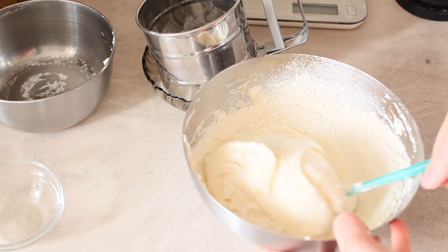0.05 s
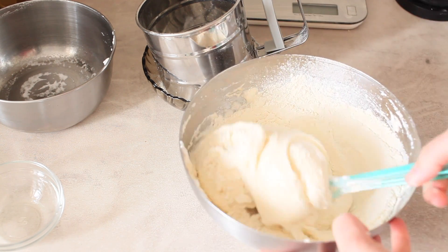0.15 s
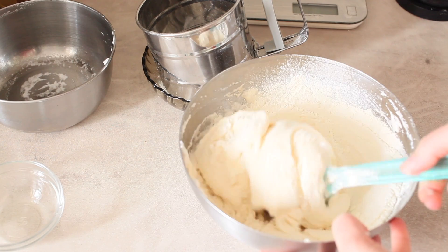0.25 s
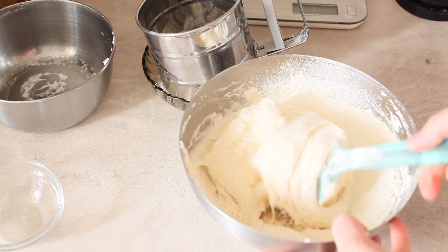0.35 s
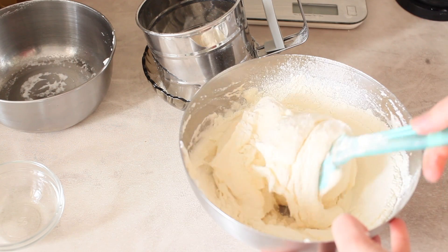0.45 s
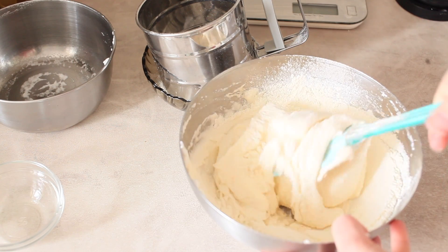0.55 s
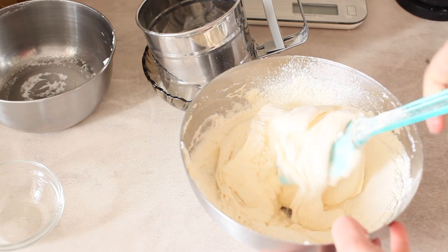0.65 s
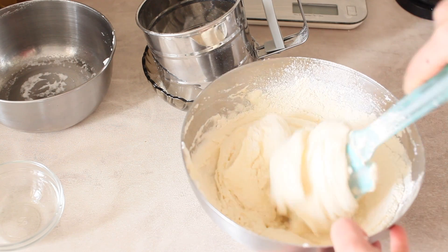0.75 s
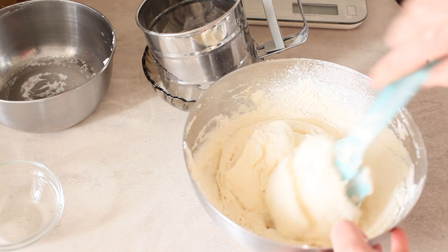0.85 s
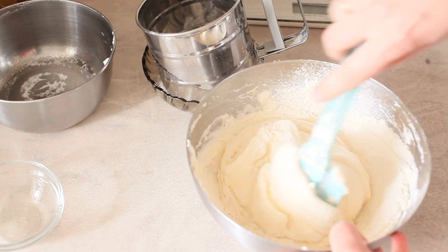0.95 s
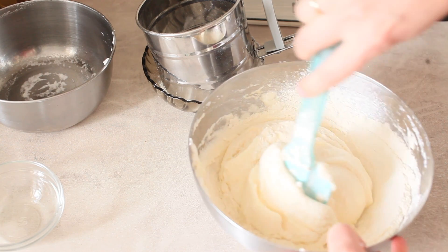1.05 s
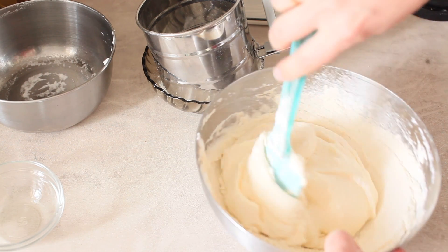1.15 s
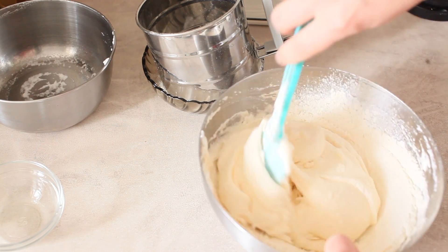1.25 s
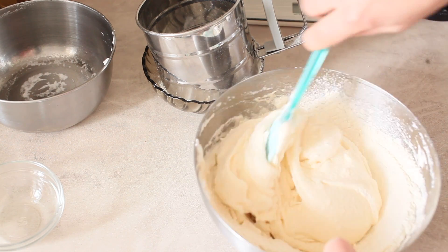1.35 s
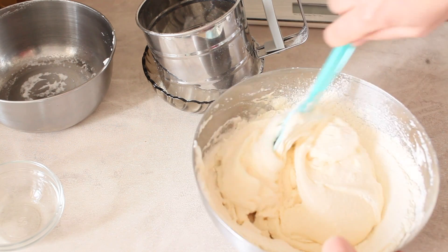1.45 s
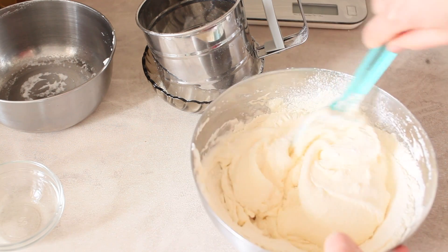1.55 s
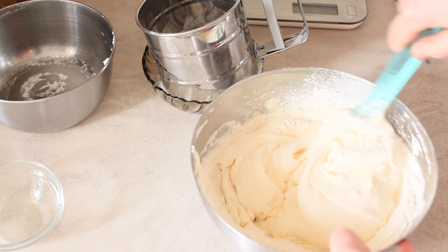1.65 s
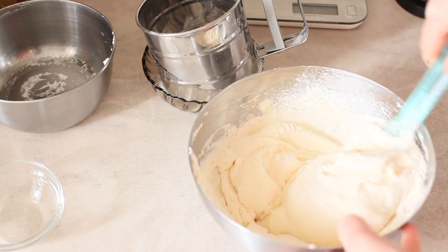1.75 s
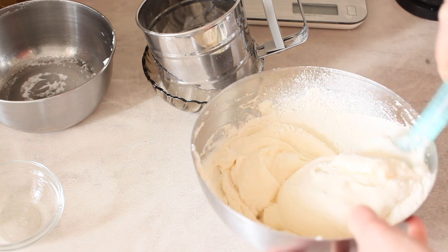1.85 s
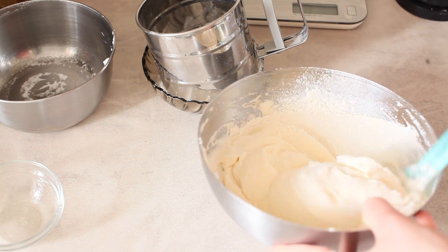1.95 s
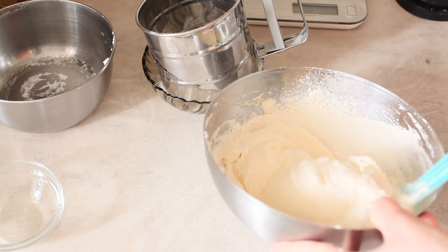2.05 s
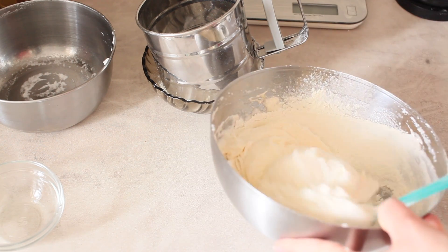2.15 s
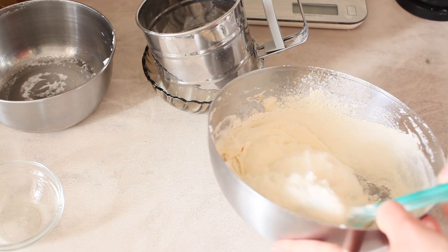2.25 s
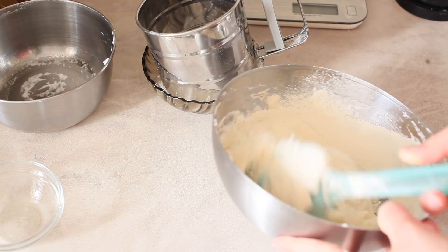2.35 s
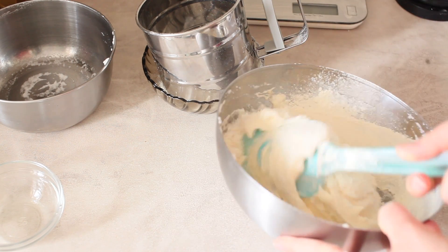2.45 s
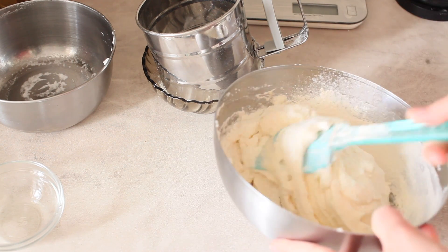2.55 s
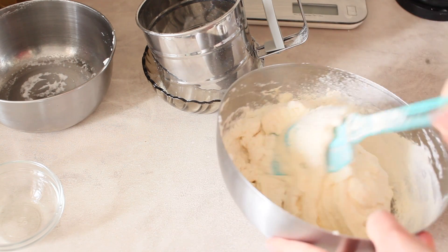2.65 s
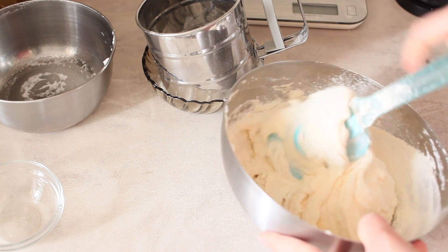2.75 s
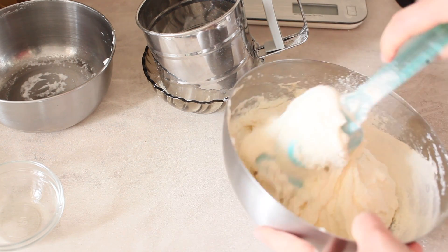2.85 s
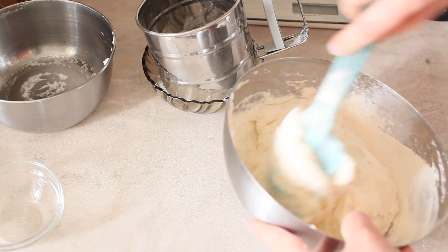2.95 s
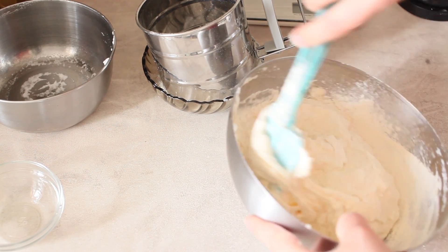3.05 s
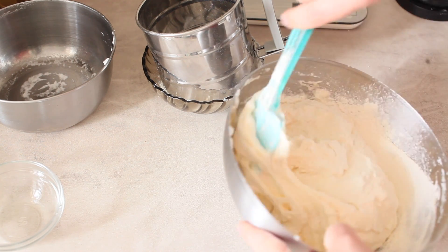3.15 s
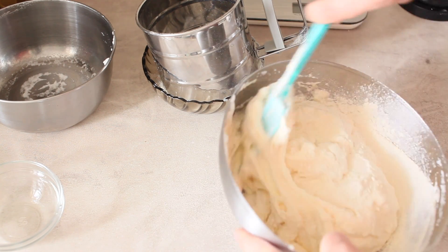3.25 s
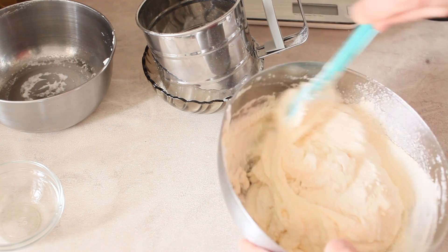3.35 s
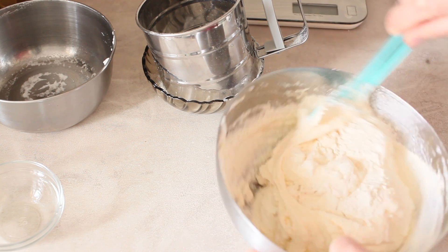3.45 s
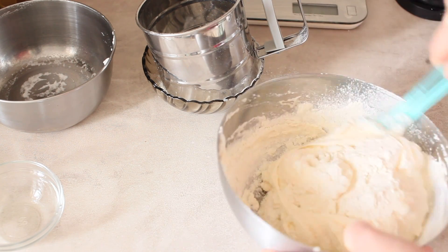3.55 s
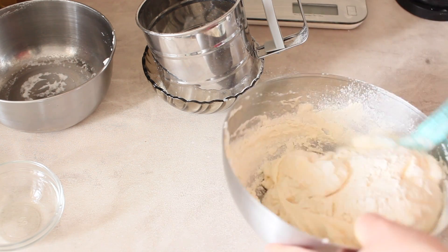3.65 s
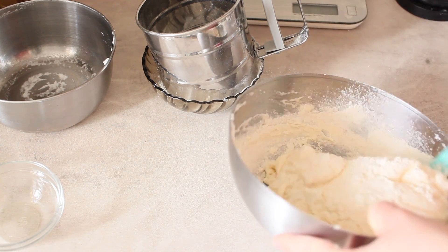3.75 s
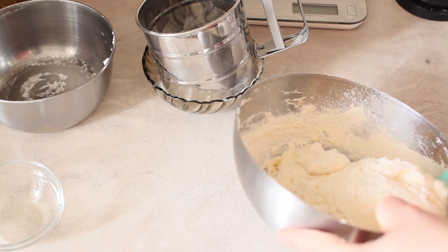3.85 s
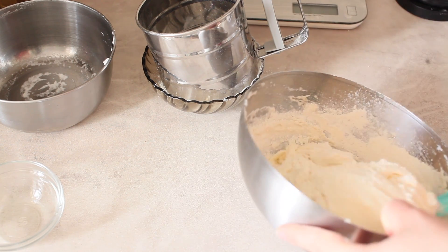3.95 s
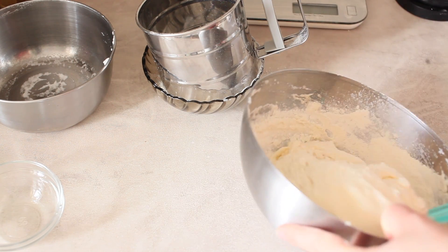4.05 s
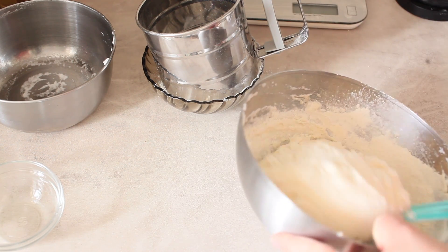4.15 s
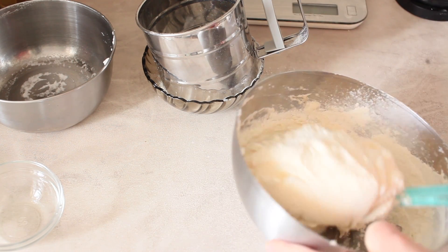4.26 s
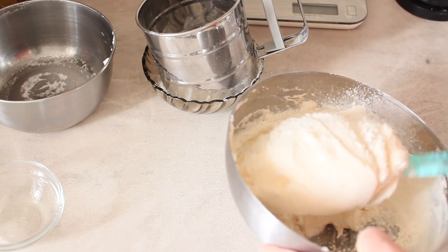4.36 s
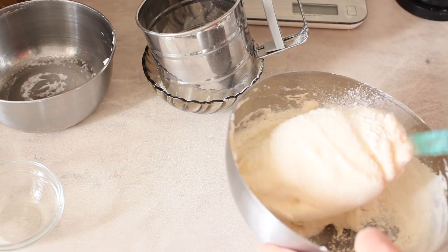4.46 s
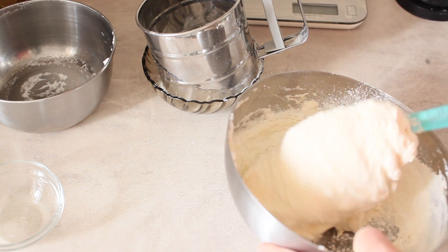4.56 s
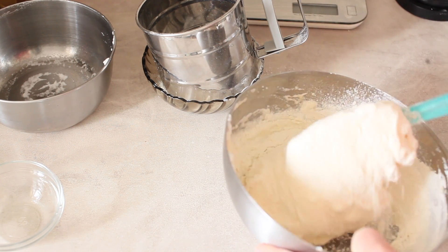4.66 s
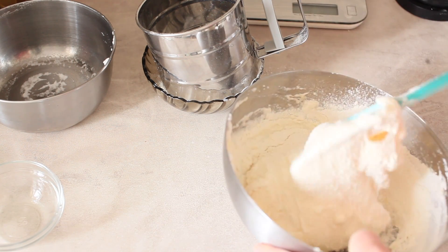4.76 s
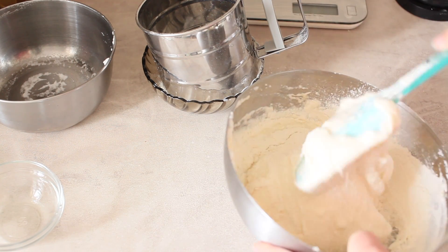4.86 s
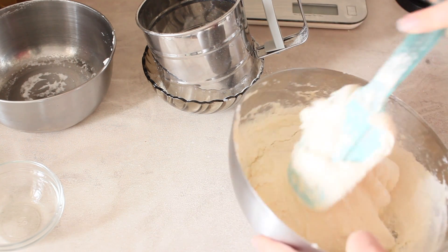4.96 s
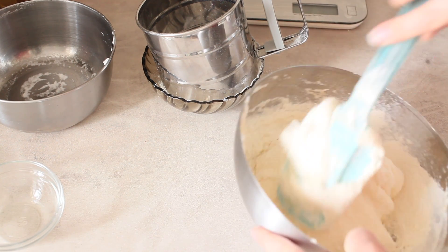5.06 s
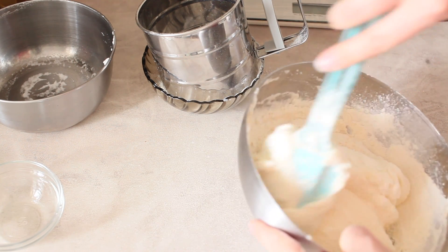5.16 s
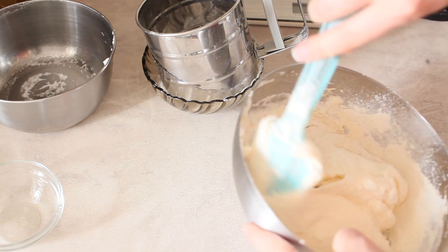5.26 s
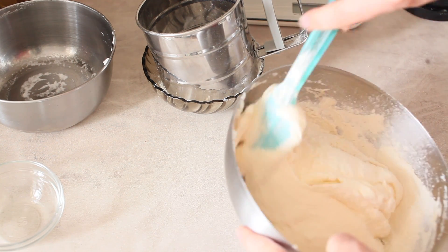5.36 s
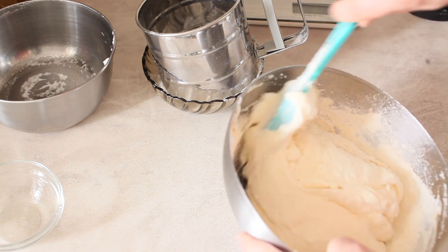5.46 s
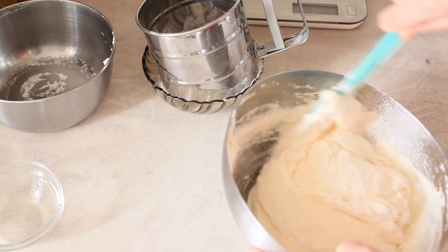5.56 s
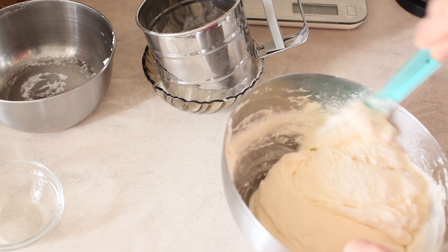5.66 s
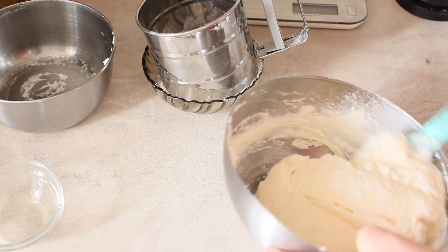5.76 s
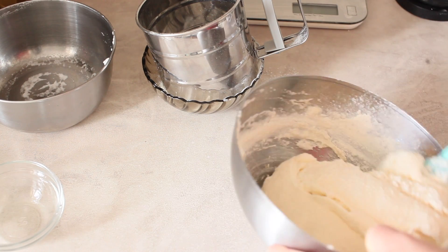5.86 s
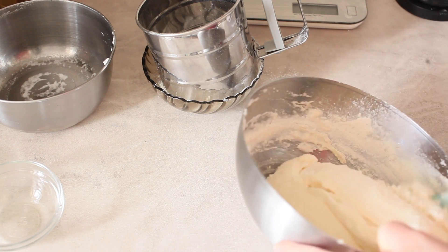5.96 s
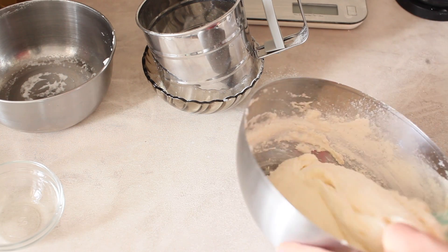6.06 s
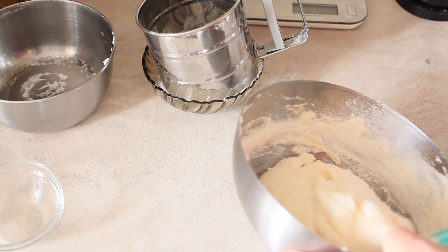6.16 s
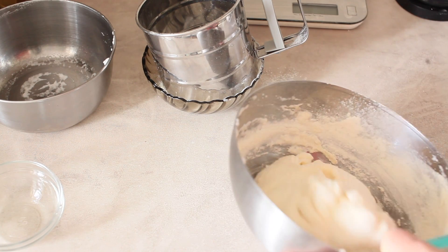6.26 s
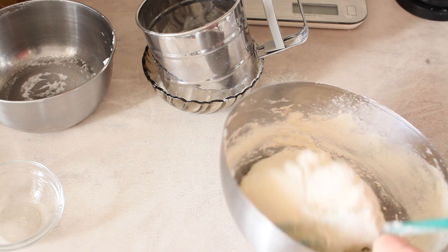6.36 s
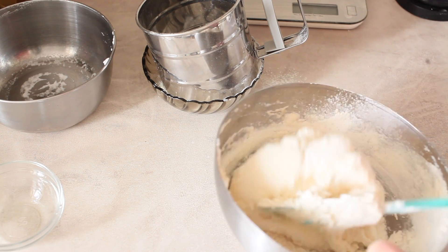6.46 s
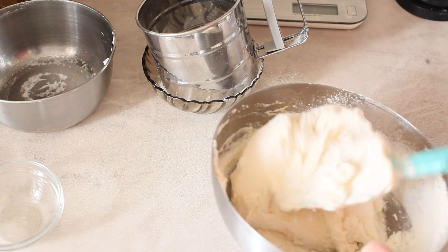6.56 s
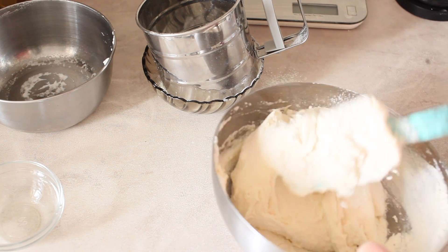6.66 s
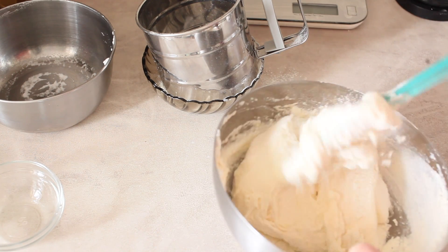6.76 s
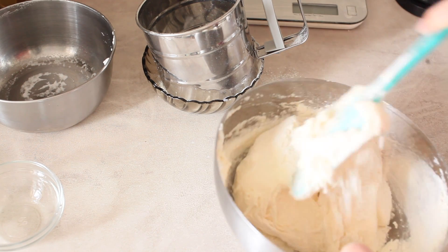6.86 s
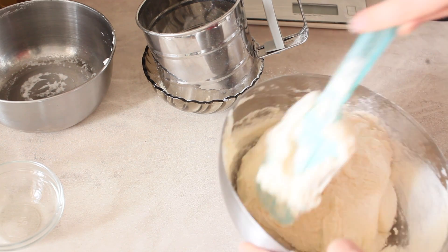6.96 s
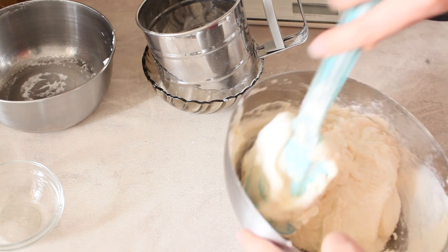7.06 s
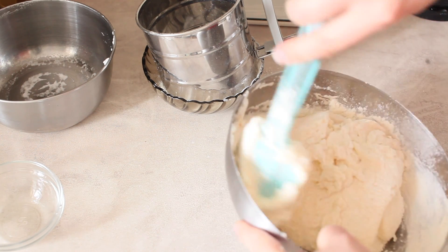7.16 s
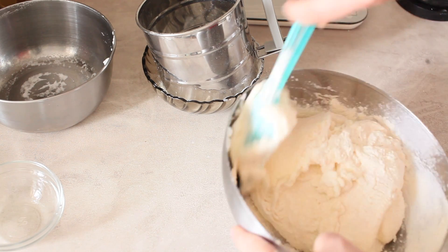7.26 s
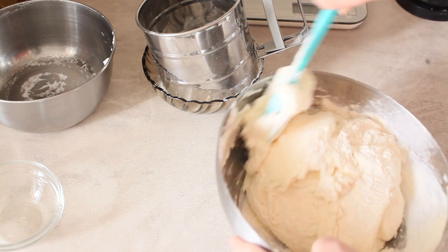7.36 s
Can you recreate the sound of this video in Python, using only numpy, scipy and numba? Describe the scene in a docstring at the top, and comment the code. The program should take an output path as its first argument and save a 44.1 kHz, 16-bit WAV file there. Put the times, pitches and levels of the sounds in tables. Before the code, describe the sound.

A silicone spatula folds batter in a stainless steel bowl, heard close in a kitchen with little echo. At the start a soft scrape leads into a quick double knock of the bowl on the worktop, at about 0.2 seconds. After a lull, the bowl knocks and rocks again at 1.5 seconds, and a hollow, hissing scrape runs until about 2.4, with short damped clangs as the edge catches the wall. A second stroke lasts from 3.1 to 4.2 seconds, with a ringing knock at 3.5. A brighter, raspier stroke runs from 5.3 to 6.3 seconds, with a knock at 5.7 and a sharp catch around 6. A last scrape begins at about 7.2 and carries on to the end. Underneath, a faint low kitchen hum rises with each stroke and sinks in the pauses.

```python
"""A hollow scrape, short clangs and a bright hiss: a silicone spatula folds batter in a steel bowl.
Stick-slip friction at the rubbing contact excites the modes of the batter-damped wall.
The bowl is held, tilted and turned, so its foot now and then knocks the kitchen worktop, ringing both.
Behind it, a noise suppressor lets the low kitchen hum swell with the work and sink after it."""
import sys
import numpy as np
from scipy import signal
from scipy.fft import rfft, irfft
from scipy.io import wavfile
from scipy.ndimage import uniform_filter1d
from numba import njit

SR = 44100
rng = np.random.default_rng(int(sys.argv[2]) if len(sys.argv) > 2 else 0)


def wrap_up_sound(samples):
    """Save the sound to the file named by the first command line argument, as 16-bit audio."""
    columns = np.atleast_2d(samples).T
    # keep every value between -1 and 1, then stretch to whole-number steps
    tamed = np.clip(columns, -1, 1)
    steps = np.round(tamed * 32767).astype(np.int16)
    wavfile.write(sys.argv[1], SR, steps)


N = 326340
T = np.arange(N) / SR

# Strokes of the blade, one list each: (time [s], hiss level [dB], hiss centre [Hz], scrape level [dB],
# scrape centre [Hz], clang level [dB], clang centre [Hz], thin clang level [dB], thin clang centre [Hz],
# top level [dB], clang spread [ln of frequency ratio], scrape spread [ln of frequency ratio])
BLADE_STROKES = [
    [(0.0, -65, 8500, -54, 1320, -70, 3000, -80, 5980, -74.5, 0.15, 0.17),
     (0.06, -59, 8800, -58, 1170, -62, 3060, -75.5, 5780, -78, 0.12, 0.177),
     (0.104, -71, 8380, -51, 1450, -69, 3110, -72, 5770, -77, 0.195, 0.12),
     (0.135, -64, 8140, -46, 1445, -58, 3050, -65, 5980, -79.5, 0.2, 0.065)],
    [(1.1, -84, 7920, -70, 1510, -84.5, 2790, -80, 6140, -90.5, 0.2, 0.049),
     (1.164, -91, 8280, -51.5, 1532, -82, 2900, -94, 6110, -96, 0.19, 0.037),
     (1.22, -94, 8220, -66, 1500, -86, 2680, -90, 5890, -94, 0.2, 0.054)],
    [(1.58, -45, 8080, -34, 980, -49, 3910, -52, 6050, -72, 0.14, 0.16),
     (1.604, -48, 8950, -52.5, 1030, -57, 3590, -65, 6030, -71.5, 0.21, 0.3),
     (1.652, -38, 9850, -52, 1410, -67, 3280, -58, 5990, -60, 0.135, 0.188),
     (1.732, -39.5, 9535, -54.5, 1200, -68, 3020, -72, 6090, -45, 0.126, 0.36),
     (1.8, -40.5, 9050, -34, 1025, -59, 4000, -68, 5250, -53.5, 0.15, 0.28),
     (1.81, -40, 9240, -29, 1104, -40, 4070, -42, 5300, -47, 0.102, 0.199),
     (1.86, -39.5, 8750, -34, 1146, -52, 3920, -63, 5240, -58, 0.13, 0.27),
     (1.894, -36.5, 9240, -33, 1215, -43, 3720, -46, 5160, -51, 0.3, 0.21),
     (1.912, -38.5, 9160, -28, 1250, -49, 3850, -58, 4960, -54, 0.19, 0.2),
     (2.02, -46, 8970, -41, 1240, -43.5, 3340, -58, 5200, -66, 0.066, 0.25),
     (2.052, -54, 8940, -43, 1295, -73, 3400, -66.5, 5840, -59.5, 0.11, 0.15),
     (2.136, -40, 9400, -52.5, 1190, -61, 3010, -57, 6330, -53.5, 0.28, 0.225),
     (2.188, -46, 9304, -52.5, 1220, -62, 2780, -62, 5850, -60, 0.22, 0.53),
     (2.224, -60, 8710, -57, 1180, -63, 2820, -67.5, 5790, -72.5, 0.21, 0.34),
     (2.356, -53.5, 8550, -53, 1295, -56.5, 3440, -60, 5910, -71, 0.26, 0.22),
     (2.376, -47, 8170, -41.5, 1320, -69.5, 3170, -70.5, 5810, -61, 0.12, 0.12),
     (2.45, -78, 8580, -68, 1250, -69, 3070, -62, 5850, -81, 0.15, 0.196)],
    [(3.14, -55, 8960, -61, 1190, -63, 3060, -73, 5560, -74, 0.16, 0.13),
     (3.156, -53, 8840, -62.5, 1150, -62.5, 3030, -72, 5620, -63, 0.25, 0.135),
     (3.206, -48.5, 8800, -54.5, 1300, -64.5, 2680, -72, 6250, -69, 0.146, 0.3),
     (3.244, -39, 9400, -57.5, 1160, -55.5, 3000, -69, 5830, -53, 0.17, 0.23),
     (3.35, -39.5, 8450, -49, 1440, -59.5, 2780, -65, 6050, -57.5, 0.22, 0.14),
     (3.39, -38.5, 9000, -50, 1390, -57.5, 2910, -56, 5560, -54, 0.17, 0.134),
     (3.51, -41.5, 9120, -41, 1450, -54, 3500, -67.5, 4820, -57.5, 0.112, 0.1),
     (3.516, -35.5, 9550, -24.5, 1350, -35, 3670, -33, 5060, -48.5, 0.11, 0.098),
     (3.56, -37.5, 9420, -37.5, 1330, -41, 3540, -44.5, 5170, -45.5, 0.15, 0.079),
     (3.598, -37, 9400, -44.5, 1530, -50, 3400, -51, 4900, -49, 0.2, 0.21),
     (3.674, -35.5, 9530, -37, 1280, -40.5, 3400, -48, 5400, -49.5, 0.18, 0.2),
     (3.726, -48, 9100, -44.5, 1530, -42, 3300, -57, 5400, -68, 0.11, 0.19),
     (3.788, -46.5, 9170, -42.5, 1110, -49, 3440, -48, 4680, -62.5, 0.22, 0.29),
     (3.812, -48.5, 9300, -39.5, 1150, -60, 3450, -57, 4760, -65.5, 0.17, 0.14),
     (3.888, -54, 9480, -47.5, 1132, -58.5, 3080, -63, 5680, -75, 0.31, 0.2),
     (4.052, -50.5, 8650, -38.5, 1090, -50.5, 3600, -57, 5120, -67, 0.29, 0.11),
     (4.118, -48, 8530, -43.5, 996, -52, 3300, -64.5, 5700, -67.5, 0.22, 0.29),
     (4.19, -74, 8280, -70.5, 1130, -73, 2920, -77, 5890, -78.5, 0.135, 0.13)],
    [(5.276, -58, 8600, -52, 1400, -58, 2990, -66.5, 6450, -74, 0.3, 0.19),
     (5.292, -41.5, 8400, -41, 1360, -47, 3000, -64, 5950, -56.5, 0.3, 0.172),
     (5.346, -33, 8600, -41.5, 1400, -44, 2500, -57, 6080, -43, 0.36, 0.22),
     (5.406, -41, 9330, -43.5, 1367, -46, 3200, -62, 5840, -55, 0.3, 0.215),
     (5.506, -34.5, 8250, -44, 1630, -46, 3300, -53, 5670, -61, 0.38, 0.16),
     (5.55, -36.5, 8000, -43, 1440, -44, 2980, -49, 4630, -47, 0.45, 0.22),
     (5.582, -40, 8440, -49, 1460, -51, 2520, -58, 5010, -49, 0.44, 0.18),
     (5.628, -38, 9440, -40, 1290, -49.5, 3210, -52, 4860, -52.5, 0.25, 0.19),
     (5.696, -33.5, 9900, -48.5, 1436, -52.5, 3050, -54, 5520, -45.5, 0.27, 0.16),
     (5.744, -33, 9000, -39.5, 1330, -41, 3390, -41, 5070, -38, 0.23, 0.234),
     (5.814, -33.5, 9200, -36, 1250, -40.5, 3170, -44.5, 5600, -46, 0.19, 0.19),
     (5.874, -42.5, 9500, -45, 1420, -50, 2960, -58, 5700, -60.5, 0.18, 0.19),
     (5.916, -53, 8800, -54, 1196, -54, 3030, -62.5, 5200, -63, 0.18, 0.25),
     (5.968, -38, 8160, -39, 1135, -37.5, 3300, -50, 4600, -47, 0.17, 0.154),
     (5.986, -33, 8480, -50, 1300, -49.5, 3190, -40, 4610, -40, 0.2, 0.17),
     (6.028, -50.5, 8900, -34.5, 1390, -39, 2860, -52, 4600, -66.5, 0.11, 0.132),
     (6.09, -44, 9350, -47, 1430, -46.5, 2950, -60, 5390, -69, 0.15, 0.13),
     (6.134, -43.5, 9300, -40, 1208, -39.5, 3360, -51, 4800, -62, 0.195, 0.16),
     (6.194, -37, 9260, -38, 1270, -41, 2870, -46.5, 5300, -54.5, 0.19, 0.131),
     (6.262, -54.5, 8400, -49, 1444, -61, 2800, -65, 5900, -67.5, 0.38, 0.083),
     (6.32, -52, 8950, -55.5, 1340, -55, 3100, -65.5, 5850, -66.5, 0.4, 0.26),
     (6.42, -80, 8050, -70, 1220, -86, 2990, -81, 5760, -82, 0.35, 0.19)],
    [(7.2, -64, 8830, -75, 1120, -65, 3420, -69, 6140, -81.5, 0.44, 0.25),
     (7.23, -44, 8970, -53, 1400, -46.5, 3300, -59, 6170, -66, 0.24, 0.31),
     (7.272, -38.5, 9070, -43.5, 1540, -41.5, 3090, -44.5, 5360, -52.5, 0.26, 0.34),
     (7.354, -36.5, 9000, -43, 1490, -37, 2960, -42.5, 5400, -45, 0.23, 0.19),
     (7.4, -37.5, 8400, -42, 1520, -41.5, 3140, -43, 5810, -43.5, 0.32, 0.16)],
]
# Catches of the edge on the wall: (time [s], level [dB], pitch [Hz], clang [dB re level],
# clang centre [Hz], hiss [dB re level], hiss centre [Hz])
EDGE_CATCHES = [ (1.807, -38, 1052, -5.5, 4100, -11, 9000), (1.827, -23, 1160, -15, 5280, -16, 9000),
                (1.886, -23, 1164, -8, 4200, -12, 9000), (1.916, -24, 1060, -3.5, 4000, -10, 9000),
                (1.973, -24, 1140, -18, 3470, -22.5, 9000), (2.006, -37, 1250, -4.5, 4740, -15.5, 9000),
                (2.313, -41, 1360, -4, 3507, 3.5, 8850), (2.366, -39.5, 1378, -15.5, 3400, 8, 8430),
                (2.709, -54.5, 996, 7.5, 3400, 1, 8800), (3.153, -53, 1096, -18, 3000, 14, 9100),
                (3.435, -30, 1440, -26.5, 3200, -11, 9000), (3.494, -23, 1600, -19, 3480, -16, 8500),
                (3.552, -26, 1920, -4, 3490, 0.5, 9500), (3.628, -46, 1390, 8.5, 4760, -9.5, 9500),
                (3.773, -39, 1083, 7, 4120, -12.5, 9000), (3.870, -30.5, 1150, -23.5, 3200, -15, 9000),
                (3.915, -30.5, 1180, -11.5, 3280, -17, 8900), (3.988, -29.5, 1078, -23.5, 3500, -21, 9000),
                (4.007, -31.5, 1100, -24, 3900, -5, 9000), (4.041, -29, 1140, -15, 3500, -14, 9000),
                (4.067, -30, 1040, -12, 4000, -16, 9000), (4.094, -32.5, 1030, -19, 3500, -14, 9000),
                (4.12, -46, 956, 0, 2540, 11, 8500), (4.638, -57, 1240, 6.5, 2200, -21, 9000),
                (5.128, -64, 1020, -21, 3500, 9, 12500), (5.278, -37.5, 1470, -11, 3760, -11, 8700),
                (5.372, -45, 1400, 5, 3800, -9.5, 8700), (5.51, -44, 1420, 12.5, 2180, -9.5, 8700),
                (5.55, -37, 1050, -1, 4820, -10, 9000), (5.79, -33, 1150, -10, 3370, -7, 9000),
                (5.948, -40.5, 1140, 5, 4660, 2, 8000), (5.967, -34, 1136, 2, 3000, 4, 8000),
                (5.992, -39, 1200, 12, 3080, -4.5, 8000), (6.013, -20, 1340, -14, 4500, -17, 9000),
                (6.052, -33, 1470, 5, 2620, 0, 9250), (6.178, -39.5, 1160, 10.5, 2730, -12.5, 9000),
                (7.106, -59, 851, 8, 6460, -2, 11000), (7.127, -59, 1470, 5, 3000, 17.5, 8600),
                (7.225, -51, 1550, 7, 6200, 22.5, 8860)]
# Knocks of the foot on the worktop: (time [s], level [dB], thud centre [Hz], rocking duration [s],
# rocking force [dB re push], wall ring [dB re level], wall clang [dB re level])
FOOT_KNOCKS = [(0.1506, -10.5, 516, 0.022, -19, -2, -12), (.171, -13, 402, 0.095, -1.5, -10.5, -11.5),
               (1.532, -26.5, 350, 0.064, -5, -11, -15), (1.546, -19.5, 750, 0.029, -3, -5, -15),
               (1.555, -12, 310, 0.085, -10.5, -23, -28), (3.515, -21, 490, 0.073, -25, -2.5, -7.5),
               (5.731, -20.5, 450, 0.025, -34.5, -7.5, -5)]
# Modes of the bowl wall, damped by batter and hand: (frequency [Hz], bandwidth [Hz], level [dB])
WALL_MODES = [(910, 110, 3), (1038, 96, 1.5), (1144, 56, -0.5), (1260, 180, 4), (1435, 143, 4),
              (1530, 76, 2.5), (1740, 330, 4.5), (1850, 390, 7.5), (2106.6, 215, 8.5), (2500, 200, 6),
              (2936, 128, 5), (3186, 88, 0.5), (3455, 88, 3), (3730, 130, 3), (4015.4, 110, 5),
              (4480, 340, -2.5), (4760, 80, -3), (5410, 500, -4), (5120, 220, -10), (5820, 71, -3),
              (6250, 92, 2), (6840, 230, -1), (7610, 300, -6), (8090, 170, -3), (8590, 190, -8),
              (8950, 940, -0.5), (9420, 150, -11), (9980, 182, -5), (10870, 1300, -5.5), (11630, 530, 0.5),
              (12080, 1800, -9), (13700, 700, -16.5), (13900, 800, -19), (14650, 800, -17),
              (15800, 700, -22)]
# Boundaries of the five families of wall modes: (frequency [Hz])
FAMILY_EDGES = [0, 2100, 4350, 7000, 12000, 16000]
SCRAPE, CLANG, THIN, HISS, TOP = ([mode for mode in WALL_MODES if low < mode[0] < high]
                                  for low, high in zip(FAMILY_EDGES, FAMILY_EDGES[1:]))
# First swing of the foot, before the worktop answers: (frequency [Hz], bandwidth [Hz], level [dB])
SLAP_MODES = [(479, 350, 0)]
# Modes of the worktop: (frequency [Hz], bandwidth [Hz], level [dB])
WORKTOP_MODES = [(69, 27.6, -2), (124, 26, 4), (178, 30, 3.5), (238, 20, 8), (284.3, 23.7, 8),
                 (340, 30, 3.5), (409, 21, -4), (498, 41, 3), (618, 22, -4.5), (680, 47, 4.5), (752, 35, 4),
                 (845, 35, -7), (936, 43, -1), (1127, 46, -4), (1265, 50, -4)]
# Spectrum of the kitchen hum: (frequency [Hz], relative spectral density [dB])
HUM_SPECTRUM = [(18, -71), (30, -18), (92, -22.5), (108, -2.5), (130, -6), (197, -5), (237, -13),
                (270, -4.5), (410, -12.5), (443, -8), (788, -15), (1110, -15), (1370, -19.5), (1500, -15.5),
                (1660, -23), (1920, -26), (6900, -30.5), (15500, -41)]


def spatula(land_s=.035, lift_s=.045, rasp_db=-3):
    """Stick-slip friction drives five families of wall modes and a dry rasp, stroke by stroke."""
    rows = []
    lifted_db = np.array([0, 30, 0, 30, 0, 30, 0, 30, 0, 30, 0, 0])  # levels drop as the edge lifts off
    for stroke in BLADE_STROKES:
        first, last = np.array(stroke[0]) - lifted_db, np.array(stroke[-1]) - lifted_db
        rows += [[first[0] - land_s, *first[1:]], *stroke, [last[0] + lift_s, *last[1:]]]
    times, *columns = np.transpose(np.array(rows, float))
    (hiss_db, hiss_hz, scrape_db, scrape_hz, clang_db, clang_hz, thin_db, thin_hz,
     top_db, clang_spread, scrape_spread) = (np.interp(T, times, column) for column in columns)
    fine = slips(7000., scatter_db=-1.5, patchy_db=0.55, patch_rate=66.)
    coarse = slips(1500., scatter_db=1.5, patchy_db=1., patch_rate=97.)
    hiss = rubbed(fine, HISS, hiss_hz, 0.14, wander_db=1.9, wander_rate=32., drift=0.012)
    hiss += undb(rasp_db) * rasp(hiss_hz)
    top = rubbed(fine, TOP, 13000., .6, wander_db=3.9, wander_rate=48., drift=0.0033)
    scrape = rubbed(coarse, SCRAPE, scrape_hz, scrape_spread, wander_db=1.8, wander_rate=30., drift=.019)
    clang = rubbed(coarse + 0.79 * fine, CLANG, clang_hz, clang_spread, wander_db=2., drift=0.017)
    thin = rubbed(coarse + 1.1 * fine, THIN, thin_hz, 0.79 * clang_spread, wander_db=2.7, drift=0.023)
    return (undb(hiss_db) * hiss + undb(top_db) * top + undb(scrape_db) * scrape
            + undb(clang_db) * clang + undb(thin_db) * thin)


def slips(per_s, scatter_db, patchy_db, patch_rate):
    """Stick-slip force: Poisson impulses of uneven size, in patches as the edge grips and lets go."""
    hit = rng.random(N) < per_s / SR
    size = undb(scatter_db * np.minimum(rng.exponential(size=N), 4.5)) * rng.standard_normal(N)
    return unit(hit * size * undb(patchy_db * walk(patch_rate)))


def rubbed(force, modes, centre_hz, spread, wander_db, drift, wander_rate=40.):
    """Forced vibration: the moving contact feeds the modes unevenly; shifting batter detunes them."""
    out, spread = 0, np.maximum(spread, .04)
    for hz, width, db in modes:
        width = max(width, hz / 42)  # the pressed blade damps every ring
        feed = undb(db + wander_db * walk(wander_rate)) * near(hz, centre_hz, spread)
        signs = rng.choice([-1., 1.], N)  # each mode feels the slips along the edge differently
        detuned_hz = hz * (1 + drift * walk(8.))
        out += ring(feed * force * signs, detuned_hz, width) / np.sqrt(width)
    return out / np.sqrt(uniform_filter1d(out ** 2, size=5000))  # running RMS held near 1


def rasp(hiss_hz, speck_db=4.5, cutoff_hz=7700):
    """Friction noise of the edge itself, with brief pings from crushed specks of flour and sugar."""
    force = slips(2500., scatter_db=1., patchy_db=2.5, patch_rate=45.)
    centre_hz, hold, specks = 1.06 * hiss_hz, SR // 45, 0
    for _ in range(5):
        crush = force * rng.standard_normal(N) * undb(3. * walk(20.))
        pitch_steps = np.clip(rng.standard_normal(N // hold + 1), -2, 2)
        speck_hz = centre_hz * np.exp(.1 * np.repeat(pitch_steps, hold)[:N])
        specks += ring(crush, speck_hz, width_hz=70.)
    friction = unit(resonate(force, centre_hz, width_hz=3300))
    return unit(highpass(friction + undb(speck_db) * unit(specks), cutoff_hz, order=8))


def catches(decay_s=0.0047):
    """Transient excitation: a few milliseconds of hard slipping leave the wall ringing freely."""
    out, t = np.zeros(N), T[:SR // 12]
    for start_s, db, pitch_hz, clang_db, clang_hz, hiss_db, hiss_hz in EDGE_CATCHES:
        jolt = np.exp(-t / decay_s) * rng.standard_normal(len(t))
        tone = struck(jolt, SCRAPE, pitch_hz, spread=0.1)
        clang = struck(jolt, CLANG + THIN, clang_hz, spread=-db / 420)
        hiss = struck(jolt, HISS + TOP, hiss_hz, spread=0.038)
        add(out, undb(db) * (tone + undb(clang_db) * clang + undb(hiss_db) * hiss), start_s)
    return out


def knocks(full_force_contact_s=0.00051, shiver_s=0.012):
    """Impact rings worktop and wall; the foot then rocks and chatters until the hand stills it."""
    out, t = np.zeros(N), T[:SR // 2]
    for start_s, db, thud_hz, rock_s, rock_db, ring_db, clang_db in FOOT_KNOCKS:
        contact_s = full_force_contact_s * undb(-0.38 * db)  # weaker knocks press longer
        push = np.sin(np.pi * np.clip(t / contact_s, 0, 1))
        rocking = np.clip(1 - t / rock_s, 0, 1) * np.clip(t / 0.015, 0, 1)
        chatter = undb(rock_db) * rocking * rng.standard_normal(len(t))
        thud = struck(push + 0.94 * chatter, WORKTOP_MODES, thud_hz, spread=1.)
        thud *= undb(-30 * np.clip(t / rock_s - .7, 0, None))  # the pressed foot damps the worktop
        slap = undb(10) * struck(push, SLAP_MODES)
        envelope = t / 0.00044 * np.exp(-t / 0.0012) + np.exp(-t / shiver_s)  # the wall trembles on
        tick = envelope * rng.standard_normal(len(t)) + 0.35 * rocking ** 2 * chatter
        low_ring = slap + struck(tick, SCRAPE)
        clang = (struck(tick, CLANG) + undb(-10.5) * struck(tick, THIN)
                 + undb(-5.5) * struck(tick, HISS, 5700., spread=0.29)
                 + undb(-32) * struck(chatter * rocking, TOP, 13000.))
        add(out, undb(db) * (thud + undb(ring_db) * low_ring + undb(clang_db) * clang), start_s)
    return out


def struck(force, modes, centre_hz=1000., spread=8.2):
    """Modal superposition: a blow rings the modes near a centre, in alternating signs, to peak 1."""
    out = 0
    for k, (hz, width, db) in enumerate(modes):
        weight = (-1) ** k * undb(db) * near(hz, centre_hz, spread) / width
        out += weight * ring(force, np.full(len(force), float(hz)), width)
    return out / np.abs(out).max()


def kitchen(x, t60_s=0.21, reverb_db=-15.5, cutoff_hz=2160):
    """Reverberation: dull, dense reflections decay exponentially behind the direct sound."""
    t = T[:SR // 2]
    reflections = signal.lfilter(*signal.butter(1, cutoff_hz, fs=SR), rng.standard_normal(len(t)))
    tail = reflections * undb(-60 * t / t60_s) * (t > .004)
    return x + undb(reverb_db) * signal.fftconvolve(x, tail / np.sqrt(np.sum(tail ** 2)))[:N]


def hum():
    """Amplitude-modulated coloured noise: octave bands swell faintly together and flicker alone."""
    hz = np.fft.rfftfreq(N, 1 / SR) + 1
    point_hz, point_db = np.transpose(HUM_SPECTRUM)
    spectrum = undb(np.interp(np.log(hz), np.log(point_hz), point_db)) * rfft(rng.standard_normal(N))
    out, swell_db = 0, 0.066 * walk(3.6)
    for octave in range(5, 15):
        band = irfft(spectrum * np.clip(1 - np.abs(np.log2(hz) - octave), 0, 1), N)
        out += band * undb(swell_db + .8 * walk(8.))
    return unit(out)


def suppressor_db(work, open_db=-45.5, shut_db=-58, start_db=-46.5, knee_db=-37.5, release_s=0.44):
    """Downward expansion: the hum's level rises with the treble of the work and sinks slowly after."""
    treble_db = 10 * np.log10(lag(highpass(work, 5940) ** 2, time_s=0.052) + 1e-12)
    wanted_db = open_db + 0.19 * np.minimum(treble_db - knee_db, 0)
    wanted_db[0] = start_db
    log_opening = np.log(np.maximum(wanted_db - shut_db, 1e-3))
    decay = T / release_s
    held_db = shut_db + np.exp(np.maximum.accumulate(log_opening + decay) - decay)  # decaying peak hold
    return start_db + lag(held_db - start_db, time_s=0.04)


def ring(x, hz, width_hz):
    """Resonators in cascade: a wide one ahead of a narrow one gives a mode steep skirts."""
    return resonate(resonate(x, hz, 3.46 * width_hz), hz, float(width_hz))


@njit
def resonate(x, hz, width_hz):
    """Second-order resonance: a state-variable band-pass, gain 1 at a centre that may move."""
    y, band_state, low_state = np.empty(len(x)), 0., 0.
    for i in range(len(x)):
        tuning, damping = np.tan(np.pi * hz[i] / SR), width_hz / hz[i]
        band = (band_state + tuning * (x[i] + 1e-18 - low_state)) / (1 + tuning * (tuning + damping))
        band_state = 2 * band - band_state
        low_state += 2 * tuning * band
        y[i] = damping * band
    return y


def near(hz, centre_hz, spread):
    """Gaussian weight on a log-frequency axis."""
    return np.exp(-.5 * (np.log(centre_hz / hz) / spread) ** 2)


def walk(rate):
    """Low-pass random modulation: levels held for 1 / rate seconds and smoothed twice."""
    hold = int(SR / rate)
    steps = np.repeat(rng.standard_normal(N // hold + 1), hold)
    return 2.11 * uniform_filter1d(uniform_filter1d(steps, hold), hold)[:N]


def lag(x, time_s):
    """Exponential relaxation towards the input, starting from zero."""
    keep = np.exp(-1 / (time_s * SR))
    return signal.lfilter([1 - keep], [1, -keep], x)


def highpass(x, hz, order=2):
    """Maximally flat high-pass filter."""
    return signal.sosfilt(signal.butter(order, hz, "high", fs=SR, output="sos"), x)


def undb(db):
    """Amplitude ratio of a level in decibels."""
    return 10 ** (np.asarray(db) / 20)


def unit(x):
    """Normalisation to an RMS of 1."""
    return x / np.sqrt(np.mean(x ** 2))


def add(out, sound, start_s):
    """Superposition of a sound from its start time."""
    i = int(start_s * SR)
    out[i:i + len(sound)] += sound[:N - i]


def scene():
    """Superposition: the bowl sounds in the room, over a hum whose level follows the work."""
    work = kitchen(spatula() + knocks() + catches())
    return (work + hum() * undb(suppressor_db(work)))[None]


def record(dry, bass_hz=70., top_hz=15700):
    """Band limiting: the microphone loses the deep bass, and the top is cut steeply."""
    return signal.sosfilt(signal.ellip(18, .2, 95, top_hz, fs=SR, output="sos"), highpass(dry, bass_hz))


dry = scene()
out = record(dry)
wrap_up_sound(out)
```